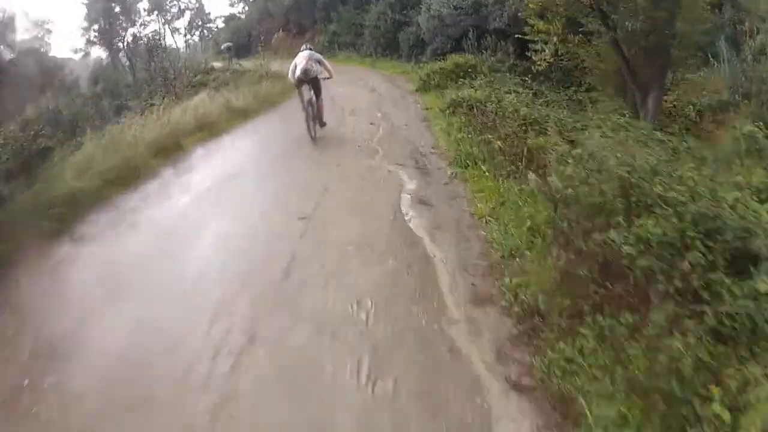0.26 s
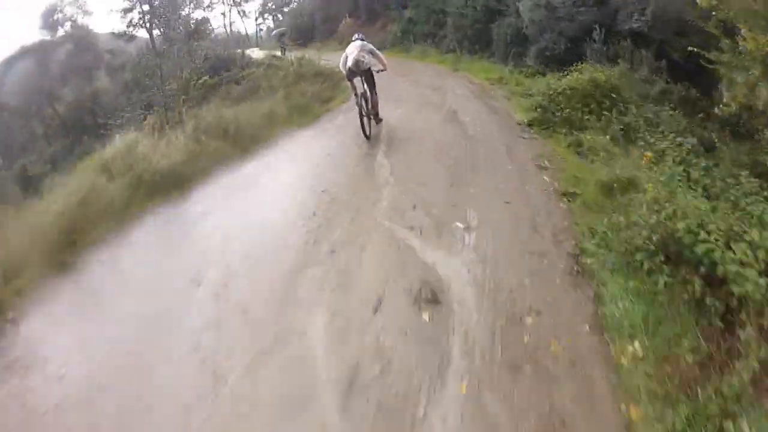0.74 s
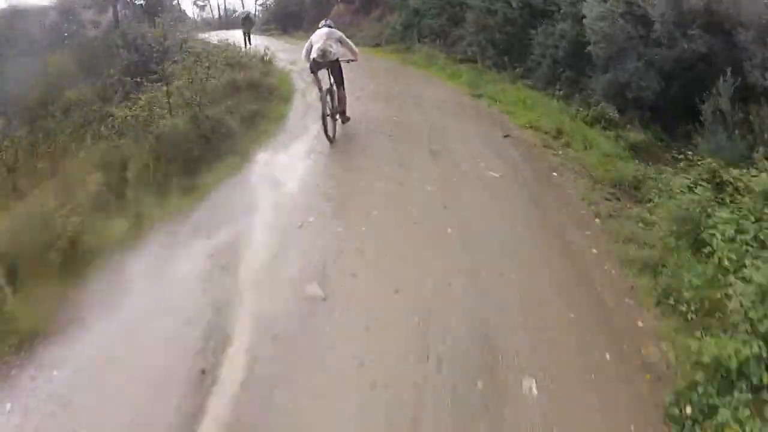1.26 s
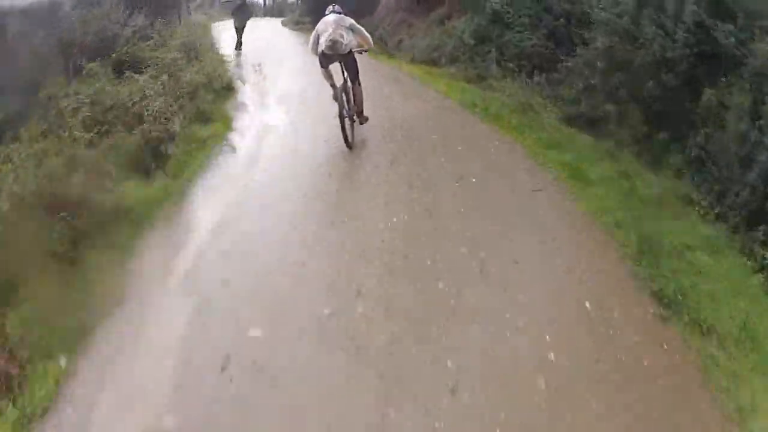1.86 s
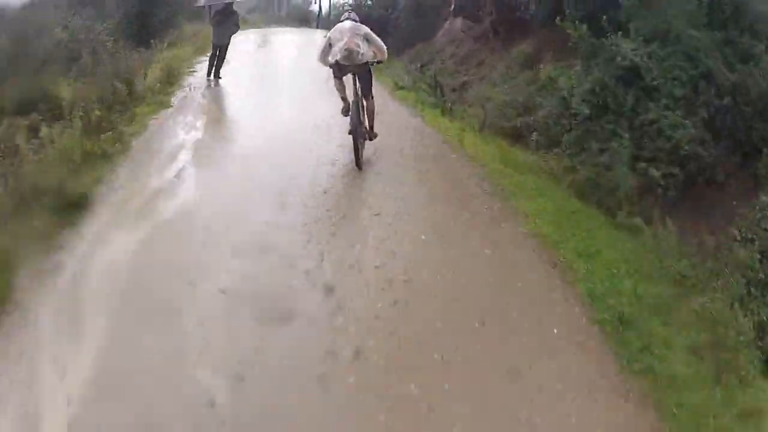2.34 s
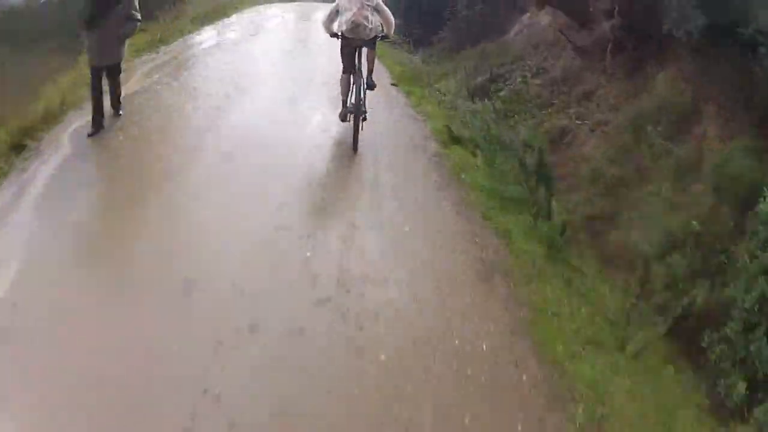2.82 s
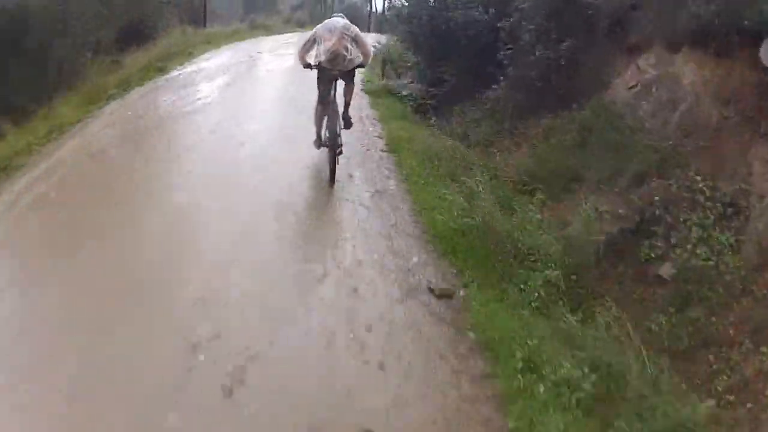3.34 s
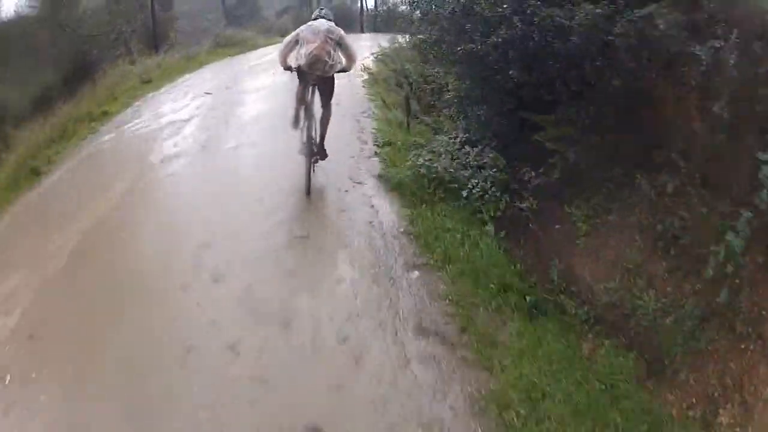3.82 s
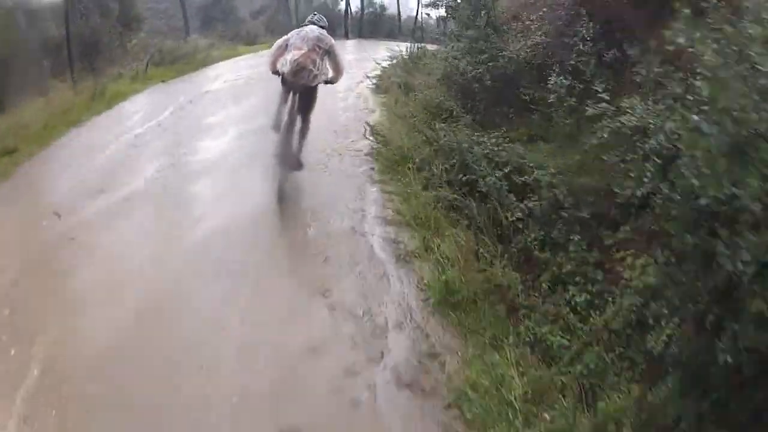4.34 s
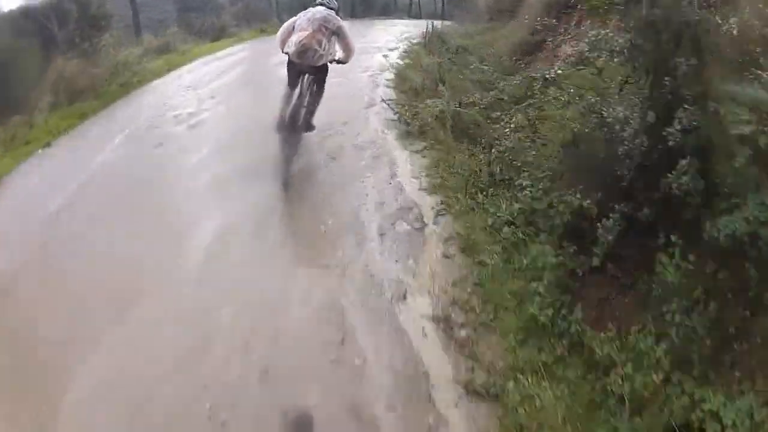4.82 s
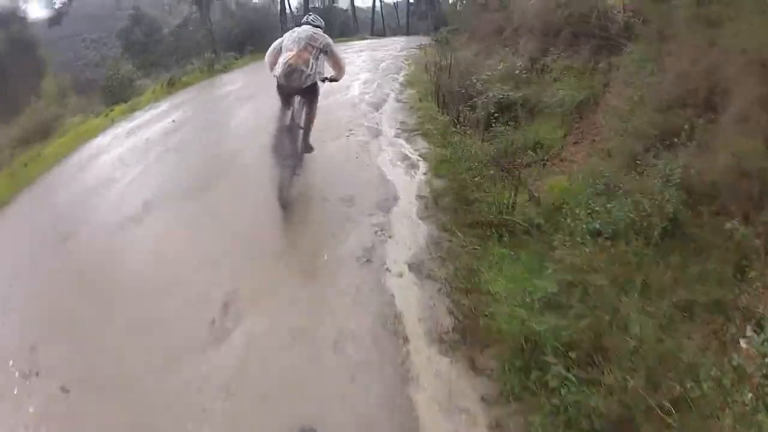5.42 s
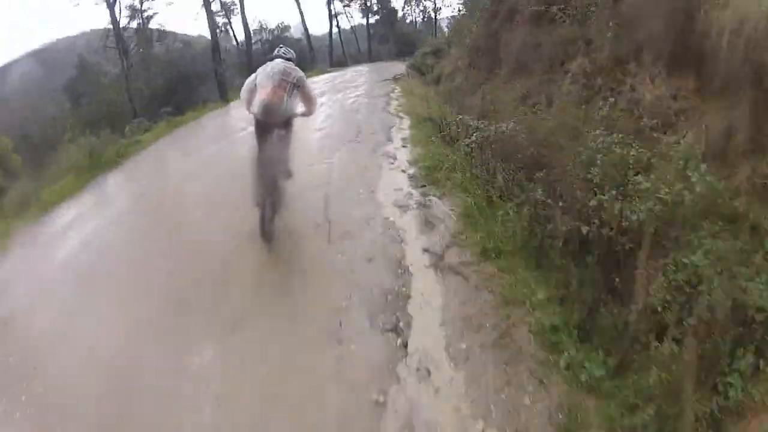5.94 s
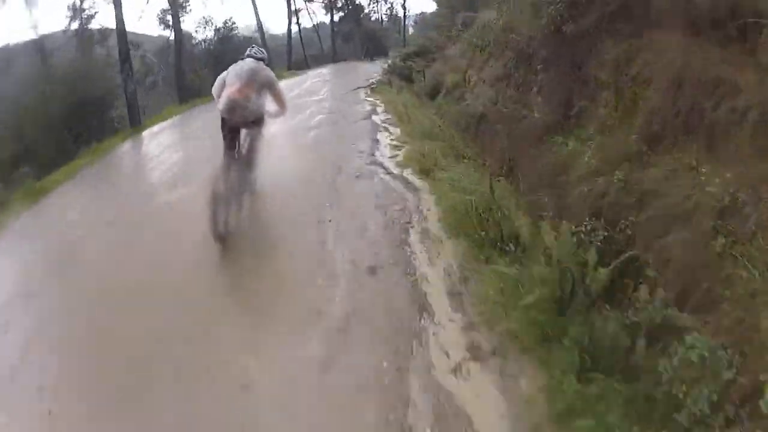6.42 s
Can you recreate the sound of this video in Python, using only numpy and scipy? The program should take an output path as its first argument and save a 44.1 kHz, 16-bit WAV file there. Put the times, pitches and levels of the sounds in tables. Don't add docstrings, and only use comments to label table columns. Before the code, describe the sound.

Bike tyres hiss along a soaked dirt track, wind thumping a cased microphone while mud and grit tick sharply on its shell.

```python
import sys
import numpy as np
from scipy import signal
from scipy.fft import rfft, irfft, next_fast_len
from scipy.io import wavfile
from scipy.ndimage import uniform_filter1d

SR = 44100
rng = np.random.default_rng(int(sys.argv[2]) if len(sys.argv) > 2 else 0)


def volts_from_decibels(level):
    exponent = np.asarray(level, float) / 20
    return 10 ** exponent


def unload_wav(signal):
    wavfile.write(
        sys.argv[1],
        SR,
        np.round(np.clip(np.atleast_2d(signal).T, -1, 1) * 32767).astype(np.int16),
    )


N = 294147


def level(x, rms_db):
    return x * volts_from_decibels(rms_db) / np.sqrt(np.mean(x ** 2))


def peak(x, peak_db):
    return x * volts_from_decibels(peak_db) / np.abs(x).max()


def curves(table):
    s, *columns = np.transpose(table)
    return [np.interp(np.arange(N) / SR, s, c) for c in columns]


def colour(x, points):
    size = next_fast_len(N)
    hz, db = np.transpose(points)
    log_hz = np.log(np.arange(1, size // 2 + 2) * SR / size)
    gain = volts_from_decibels(np.interp(log_hz, np.log(hz), db))
    return irfft(rfft(x, size) * gain, size)[:N]


def walk(rate_hz):
    hold = int(SR / rate_hz)
    held = np.repeat(rng.standard_normal(N // hold + 1), hold)
    return 1.25 * uniform_filter1d(uniform_filter1d(held, hold), hold)[:N]


def ring(modes, t):
    return sum(volts_from_decibels(db - 60 * t / t60_s) * np.sin(2 * np.pi * hz * t) for hz, db, t60_s in modes)


def add(out, s, x):
    i = int(s * SR)
    out[i:i + len(x)] += x[:N - i]


def droplets(rate_hz, spread_db, share):
    sizes = volts_from_decibels(spread_db * np.minimum(rng.exponential(size=N), 3.5))
    impacts = (rng.random(N) < rate_hz / SR) * sizes
    bursts = signal.fftconvolve(impacts, np.exp(-np.arange(400) / (0.0075 * SR)))[:N]
    return rng.standard_normal(N) * np.sqrt(1.5 + share * level(bursts, 0) ** 2)


def follow(water_db, pace_db, base_db, per_water, per_pace):
    return base_db + per_water * (water_db + 50) + per_pace * (pace_db + 52)


def spray(water_db, pace_db):
    # f/Hz, density/dB
    body_points = [(820, -43.5), (1400, -14), (1580, -1), (1710, 2), (1840, 0), (1990, 1), (2090, -1.5),
                   (2430, -4.5), (2700, -14.5), (3510, -18), (5940, -120)]
    # f/Hz, density/dB
    hollow_points = [(240, -18.5), (400, -10.5), (454, -13.5), (496, -12.5), (520, -15), (746, -16),
                     (864, -11), (1050, -6.5), (1220, -1), (1400, -4), (1820, -24.5), (3080, -120)]
    fine_points = [(2300, -14), (2700, -9.5), (3300, -3), (3800, 3.5), (4300, -8.5), (4800, -62)]
    hollow_db = follow(water_db, pace_db, base_db=-53, per_water=0.43, per_pace=0.33)
    fine_db = follow(water_db, pace_db, base_db=-60, per_water=0.78, per_pace=0.61)

    wet = droplets(rate_hz=200, spread_db=7.5, share=0.18)
    body = level(colour(wet, body_points), 0) * volts_from_decibels(water_db + 1.2 * walk(14))
    hollow = level(colour(wet, hollow_points), 0) * volts_from_decibels(hollow_db + 0.55 * walk(12))
    fine = colour(wet + 0.87 * rng.standard_normal(N), fine_points)
    return body + hollow + level(fine, 0) * volts_from_decibels(fine_db + 1.8 * walk(18))


def rumble(pace_db):
    # f/Hz, density/dB
    frame_points = [(41, -37), (70, -18), (86, -3), (140, 1), (209, -0.5), (270, -7), (360, -12.5),
                    (500, -35), (650, -44), (1100, -120)]
    shaking = colour(droplets(rate_hz=52, spread_db=6.5, share=0.36), frame_points)
    return level(shaking, 0) * volts_from_decibels(pace_db + 1.6 * walk(10))


def gusts():
    # mid t/s, push/dB, half length/s, flutter/dB
    gust_table = [(0.085, -34.5, .09, -45), (0.253, -29.5, 0.086, -35), (0.357, -23.5, 0.057, -35),
                  (0.575, -30, 0.054, -56), (0.802, -32.5, 0.067, -37), (0.955, -28, 0.069, -38.5),
                  (1.115, -32, 0.069, -46), (1.586, -37.5, 0.2, -60), (1.93, -34, 0.16, -54),
                  (2.16, -37, 0.1, -43), (2.384, -27.5, 0.064, -56), (2.657, -38.5, 0.082, -51),
                  (2.98, -44, 0.057, -48), (3.152, -43, 0.026, -57), (3.738, -32.5, 0.089, -49),
                  (4.058, -42, 0.11, -48), (4.365, -38.5, 0.084, -45.5), (4.657, -32, 0.12, -52),
                  (5.03, -26, 0.072, -37), (5.217, -32.5, 0.092, -47), (5.494, -30.5, 0.11, -53),
                  (5.774, -28, 0.078, -43), (5.966, -36, 0.044, -40.5), (6.168, -43, 0.074, -41),
                  (6.33, -29, 0.056, -42.5), (6.608, -25, 0.091, -32)]
    lull_db, lull_flutter_db = -45.5, -54
    t = np.arange(N) / SR
    push, flap = volts_from_decibels(lull_db) ** 2, volts_from_decibels(lull_flutter_db) ** 2
    for s, push_db, half_s, flutter_db in gust_table:
        bell = np.exp(-((t - s) / half_s) ** 2)
        push = push + volts_from_decibels(push_db) ** 2 * bell
        flap = flap + volts_from_decibels(flutter_db) ** 2 * bell
    return np.sqrt(push), np.sqrt(flap)


def wind():
    # t/s, peak/dB, half length/s
    eddies = [
        (0.338, -21, 0.0087),
        (5.049, -18, 0.0096),
        (5.795, -28, 0.014),
        (6.583, -19.5, 0.0069),
    ]
    push, flap = gusts()
    swell_points = [(7, -26), (13, 5.5), (20, -2.5), (30, 1.5), (40, -0.5), (52, -17.5), (70, -45)]
    swell = level(colour(rng.standard_normal(N), swell_points), 0)
    envelope = np.abs(signal.hilbert(swell, next_fast_len(N))[:N])
    swell = level(swell / (0.5 + envelope) ** 0.24, 0)
    swell = colour(swell + 0.18 * swell ** 2, [(5, -40), (11, 2), (60, 0), (120, -11)])
    flutter_points = [(35, -1.5), (50, -1), (70, -11.5), (95, -11.5), (130, -69)]
    flutter = colour(rng.standard_normal(N), flutter_points)
    out = level(swell, 0) * push * volts_from_decibels(-0.3) + level(flutter, 0) * flap * volts_from_decibels(3.5)

    t = np.arange(N) / SR
    for s, peak_db, half_s in eddies:
        u = ((t - s) / half_s) ** 2
        out = out + volts_from_decibels(peak_db) * (1 - u) * np.exp(-u / 2)
    return out


def knocks():
    # t/s, peak/dB, f/Hz, upper modes/dB re low mode, direction/sign
    bumps = [
        (0.21, -17, 215, -13, 1),
        (.327, -19, 227, -14, -1),
        (4.974, -36, 205, -25, 1),
        (5.04, -27.5, 227, -32, 1),
        (6.104, -19, 200, -23, -1),
        (6.288, -26.5, 161, -15, -1),
        (6.506, -26, 120, -23, 1),
    ]
    out, t = np.zeros(N), np.arange(6000) / SR
    push = 1 - np.exp(-t / 0.0017)
    for s, db, hz, upper_db, direction in bumps:
        modes = [(hz, db, 0.048), (410, db + upper_db - 1.5, 0.03),
                 (780, db + upper_db - 0.5, 0.03), (1230, db + upper_db, 0.035)]
        add(out, s, direction * ring(modes, t) * push)
    return out


def hits():
    # t/s, peak/dB, ring f/Hz, length/ms
    grit_hits = [(0.353, -26.5, 1930, 4.8), (.567, -26, 2420, 1.4), (.907, -28.5, 1660, 1.6),
                 (1.5678, -33.5, 1670, 4.4), (1.609, -37, 1600, 5.2), (1.6418, -24, 2390, 3.7),
                 (1.835, -34.5, 2230, 1.4), (1.912, -36.5, 2270, 6.5), (2.0203, -25, 2450, 2.7),
                 (2.14, -37.5, 1690, 4.7), (2.1903, -37.5, 1640, 2.7), (2.221, -32.5, 2070, 1.2),
                 (2.3495, -40.5, 3300, 8.1), (2.356, -32.5, 3200, 2.5), (2.4179, -32.5, 1780, 2.6),
                 (3.222, -35.5, 1760, 1.7), (3.5512, -39, 1610, 2.2), (3.58, -34, 1850, 3.1),
                 (3.8976, -35.5, 2100, 2.7), (3.9336, -33, 2300, 2.8), (4.444, -48.5, 3400, 6.2),
                 (4.783, -19, 1820, 1.4), (5.096, -30, 2275, 4.5), (5.108, -31.5, 1770, 4.5),
                 (5.3222, -22, 1640, 4.2), (5.6952, -34.5, 1940, 2.7), (5.8966, -24.5, 2176, 4.4),
                 (6.055, -36.5, 1640, 4.8), (6.186, -35.5, 1660, 4.6), (6.294, -32, 1310, 2.7)]
    clod_hits = [(.307, -39, 1760, 3.4), (0.612, -30, 1730, 2.2), (0.7645, -12.5, 1950, 0.81),
                 (1.1178, -24.5, 1700, 1.5), (1.2975, -31, 1960, 2.8), (1.325, -32, 2120, 3),
                 (1.4698, -31.5, 2330, 4.7), (1.5165, -19, 1845, 1.9), (3.1496, -27.5, 1760, 2.1),
                 (3.4047, -29, 2280, 2.5), (3.438, -38.5, 2380, 1.9), (3.6292, -30, 1770, 2.2),
                 (3.638, -32, 2280, 4.6), (4.0099, -19.5, 2120, 2.1), (4.0345, -24, 1720, 5.3),
                 (4.0414, -30, 2320, 4.9), (4.098, -19.5, 2090, 2.1), (4.148, -13, 2410, 1.95),
                 (4.254, -41.5, 1860, 7.), (4.654, -32.5, 2400, 3.), (4.732, -13, 1550, 1.76),
                 (5.0635, -34, 1230, 3.6), (5.499, -34, 2410, 2.9), (5.606, -33, 2050, 2.8),
                 (6.031, -21, 2430, 1.9), (6.041, -33, 1230, 1), (1.966, -39, 3500, 3.),
                 (2.464, -40, 2390, 1.8), (4.708, -40, 2000, 2.7), (4.933, -44, 3500, 4.)]
    mud_hits = [(1.6442, -23.5, 1290, 2.8), (3.181, -34.5, 1750, 1.9), (4.0595, -38, 1140, 3.4),
                (4.0882, -11, 1590, 2.7), (4.2584, -41, 1120, 4.), (4.6314, -21.5, 1730, 2.5),
                (4.6634, -20, 1660, 3.2), (4.666, -25.5, 1200, 3.4), (4.7447, -24, 1630, 3.2),
                (4.8389, -12, 1980, 1.54), (4.8441, -25.5, 1620, 3.4), (4.9087, -30.5, 2030, 2.5),
                (4.971, -35, 1140, 3.4), (4.984, -20, 1460, 2.6), (5.2255, -30, 1060, 5.),
                (5.237, -22, 1630, 3.1), (5.365, -16.5, 1770, 2.2), (5.5359, -22, 1900, 2.6),
                (6.015, -34, 1780, 6.8), (6.092, -33, 1580, 3.5)]
    splat_hits = [(2.8144, -43.5, 1220, 12.), (4.054, -31, 1270, 13.4), (4.118, -34.5, 1260, 5),
                  (4.1325, -21, 1224, 4.2), (4.1784, -28, 1200, 2.7), (4.5115, -28, 1250, 3),
                  (4.7717, -36, 1730, 1.5), (4.7781, -21.5, 1160, 2.9), (4.9684, -28.5, 1840, 4.4),
                  (5.2198, -20.5, 1560, 3.7), (5.2515, -19.5, 1790, 3.2), (5.26, -22, 1500, 3.5),
                  (5.8206, -34.5, 1230, 5.6), (5.825, -38, 1150, 3.7), (5.904, -31, 1060, 2),
                  (4.5267, -37, 1450, 2.6), (4.361, -44, 1200, 13)]
    # crack/dB re lump, shell ring/dB re lump
    kinds = [
        (-3, -10),
        (-11.5, -9.5),
        (-34, -9.5),
        (-32, 0.9),
    ]
    rows = []
    for table, kind in zip((grit_hits, clod_hits, mud_hits, splat_hits), kinds):
        rows += [row + kind for row in table]

    specks, length_ms = 24, 4.5
    for s in rng.random(specks) * N / SR:
        peak_db = -48 + 2 * rng.standard_normal()
        hz = 1700 * np.exp(0.17 * rng.standard_normal())
        rows.append((s, peak_db, hz, length_ms) + kinds[0])
    return rows


def ticks():
    # f/Hz, level/dB, t60/s
    shell_modes = [(1270, 8.5, 0.022), (1060, -8, 0.014), (1660, 6, 0.026), (2170, -3, 0.017)]
    # f/Hz, level/dB, t60/s
    crack_modes = [(2860, 22.5, 0.0033), (3500, 21.5, 0.0051)]
    out, t = np.zeros(N), np.arange(1500) / SR
    crack_ring, shell_ring = ring(crack_modes, t), ring(shell_modes, t)
    for s, db, hz, length_ms, crack_db, shell_db in hits():
        grain = rng.standard_normal(len(t))
        u = t / (length_ms / 3270)
        press = u * np.exp(-u)
        turns = np.cumsum(hz * (0.97 + 0.13 * np.exp(-u))) / SR
        rough = 1 + 0.9436 * uniform_filter1d(grain, size=12)
        spot = press * rough * np.sin(2 * np.pi * turns)
        crack = np.convolve((u * np.exp(-1.6 * u) * grain)[:500], crack_ring)
        shell = np.convolve((press * grain[::-1])[:500], shell_ring)
        add(out, s - 0.0002, peak(spot, db + 1))
        add(out, s - 0.0003, peak(crack, db + crack_db + 4.5) + peak(shell, db + shell_db + 0.5))

    stiff = signal.butter(6, 920, "high", fs=SR, output="sos")
    leak = colour(np.abs(out), [(120, -30), (260, 0.5), (600, -1.5), (900, -30)])
    return signal.sosfilt(stiff, out) + volts_from_decibels(-24) * leak


def scene():
    # t/s, water under the tyres as spray/dB, pace as frame rumble/dB
    ride = [(0.0, -42.5, -47.5), (0.35, -41.5, -48.5), (0.89, -43, -49.5), (1.33, -46.5, -50.5),
            (1.56, -46, -51), (2.0, -48, -55), (2.45, -52, -54), (2.8, -55.5, -57), (3.33, -54.5, -52),
            (3.6, -55.5, -56.5), (4.0, -57, -56), (4.25, -58, -53), (4.67, -55.5, -55), (5.11, -56, -54),
            (5.56, -51, -55.5), (5.78, -56, -52.5), (6.0, -49.5, -54), (6.67, -49.5, -53)]
    water_db, pace_db = curves(ride)
    mix = spray(water_db, pace_db) + rumble(pace_db) + wind() + knocks() + ticks()
    return mix[None]


def stepped(x):
    kept_hz, held = 8000, 6
    guarded = colour(x, [(3680, 0), (3800, -8), (3900, -7), (4000, -9), (4200, -25)])
    kept = signal.resample_poly(guarded, kept_hz // 100, SR // 100, window=("kaiser", 6.0))
    return signal.resample_poly(np.repeat(kept, held), SR // 300, kept_hz * held // 300)[:N]


def low_pass(x):
    return signal.sosfilt(signal.butter(12, 16170, fs=SR, output="sos"), x)


def record(dry):
    steps = stepped(dry[0])
    bright = colour(steps, [(5000, 0), (11000, 1), (15100, 0.4), (15350, -38)])
    top = colour(steps, [(15100, -50), (15350, 0), (16400, -1), (16800, -50)])
    treble = colour(steps, [(8800, -50), (9000, 0), (11000, 0), (11500, -50)]) ** 2
    sharp = uniform_filter1d(treble, size=120) / uniform_filter1d(treble, size=6000)
    gate = np.clip(sharp / 3 - 1, 0, 1)
    mix = bright + volts_from_decibels(-12) * gate * top
    return low_pass(mix[None])


dry = scene()
out = record(dry)
unload_wav(out)
```